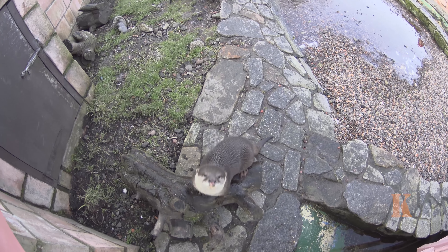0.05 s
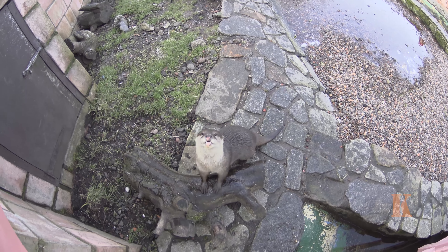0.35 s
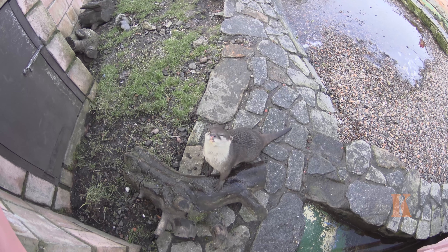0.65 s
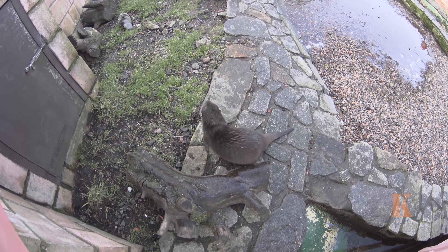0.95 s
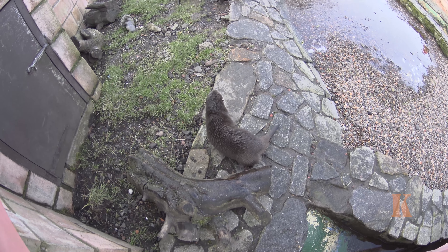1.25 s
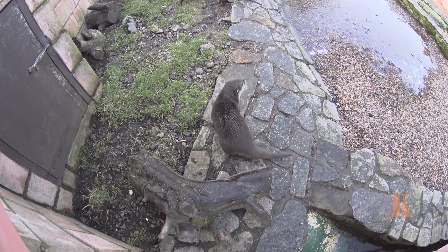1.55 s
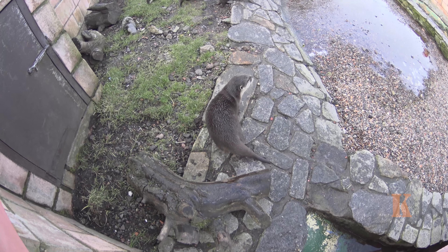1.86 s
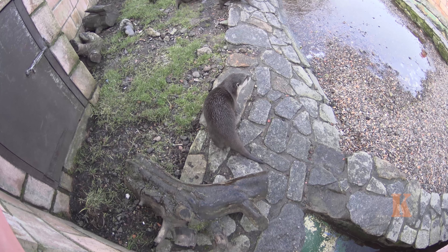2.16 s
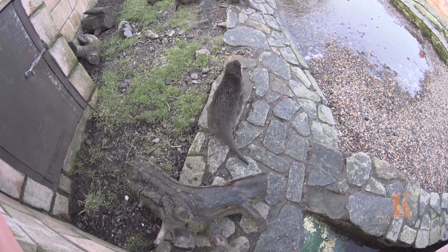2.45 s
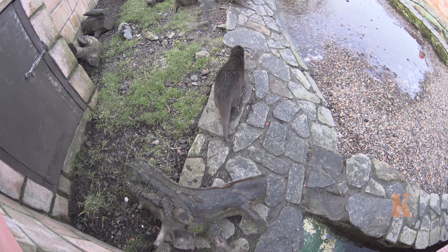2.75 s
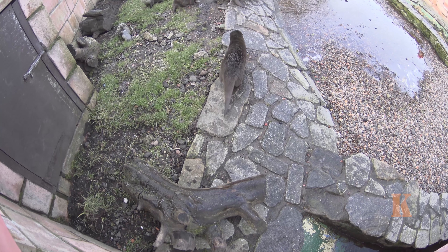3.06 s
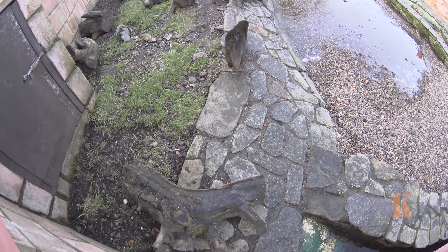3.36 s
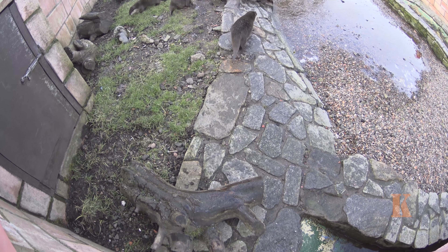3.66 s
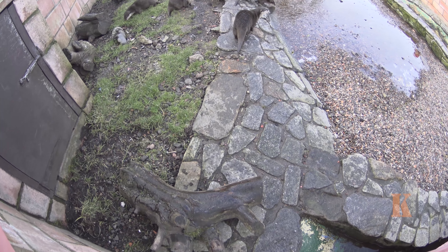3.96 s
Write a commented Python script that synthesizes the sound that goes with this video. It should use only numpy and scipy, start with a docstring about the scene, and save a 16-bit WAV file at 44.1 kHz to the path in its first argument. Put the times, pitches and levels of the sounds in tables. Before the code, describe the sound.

An otter gives high, whistling squeaks that fall in pitch and end hoarse. The loudest comes at 0.3 seconds, just after rubbing and two sharp knocks on the microphone's plastic case. From 1.4 seconds six more follow about every half second, growing fainter and slightly more echoing. Light bumps tap the case from 0.8 seconds. Soft wind, thin hiss, ticking grit and a few faint water gurgles lie underneath.

```python
"""An otter walks off along a stone path in a walled pen, over soft wind and a thin hiss.
First a low call dies away while the camera's plastic case is rubbed and knocked twice, ringing near
1.5 kHz. Grit ticks underfoot, water gurgles, and at 0.3 s comes the otter's first high, falling squeak.
From 0.8 s light bumps shake the case. From 1.4 s six more squeaks follow, with a growing share of echo
from the walls. Near the end the water gurgles again."""
import sys
import numpy as np
from scipy import signal
from scipy.fft import rfft, irfft, next_fast_len
from scipy.io import wavfile
from scipy.ndimage import uniform_filter1d, map_coordinates

SR = 44100
rng = np.random.default_rng(int(sys.argv[2]) if len(sys.argv) > 2 else 0)


def put_to_file(sound):
    """Save the sound as 16-bit audio at rate SR, in the file named by the first command-line argument."""
    columns = np.atleast_2d(sound).T  # one column per channel
    safe = np.clip(columns, -1, 1)
    whole_steps = np.round(safe * 32767)
    wavfile.write(sys.argv[1], SR, whole_steps.astype(np.int16))


N = 176400
T = np.arange(N) / SR
TOP_HZ = 15600  # the highest sound the camera keeps

def amp(db):
    """Turn decibels into a number to multiply by."""
    return 10 ** (np.asarray(db) / 20)

def unit(x):
    """Scale a sound to an average strength (rms) of 1."""
    return x / np.sqrt(np.mean(x ** 2) + 1e-20)

def along(points, hz):
    """Read between (f/Hz, value) points, with octaves evenly spaced."""
    f, v = np.transpose(points)
    return np.interp(np.log(hz + 1), np.log(f + 1), v)

def curves(rows):
    """Join timed points with straight lines, one curve for each column after the time."""
    times, *columns = np.transpose(rows)
    return [np.interp(T, times, column) for column in columns]

def wobble(rate):
    """A smooth curve through `rate` random values a second."""
    return map_coordinates(rng.standard_normal(int(N * rate / SR) + 4), [T * rate])

# How alike left and right are (1 = the same): f/Hz, likeness
LIKENESS = [(30,1),(150,0.97),(350,0.68),(700,-0.083),(1300,0.74),(1780,1),(2080,-0.8),(2700,-0.69),(3600,0.56),(13000,0.93)]
def noise(colour):
    """Stereo noise; its colour says how strong the low and high parts are."""
    hz = np.fft.rfftfreq(N, 1 / SR)
    width = np.tan(np.arccos(np.clip(along(LIKENESS, hz), -.95, 1)) / 2)
    spectrum = rfft(rng.standard_normal((2, N))) * amp(along(colour, hz))
    mid, side = irfft(spectrum * [np.ones(len(hz)), width], N)
    return np.array([mid + side, mid - side]) / mid.std()

def bursts(rows, colour, fade_s):
    """A puff of noise for each (t/s, level/dB) row, dying by 60 dB in fade_s."""
    out, source = np.zeros((2, N)), noise(colour)
    t = T[:SR // 8]
    shape = amp(-60 * t / fade_s) * (1 - np.exp(-t / 0.00037))
    for start, db in rows:
        span = slice(round(start * SR), round(start * SR) + len(t))
        out[:, span] += amp(db) * unit(source[:, span] * shape) * np.sqrt(np.mean(shape ** 2))
    return out

# The wind's rise and fall: t/s, level/dB
WIND_LEVEL = [(0,-54),(.28,-67),(.48,-51),(.67,-72),(.8,-54),(1.19,-54.5),(1.28,-61.5),(1.7,-68),(2.2,-61.5),(2.4,-73),(3.1,-67),(3.72,-54.5),(4,-69.5)]
# Its low rumble: f/Hz, level/dB
WIND_TONE = [(20,-14),(40,-9.5),(100,-0.5),(150,-2),(200,5),(300,2),(500,-4.5),(800,-4),(1500,-17),(4000,-73)]
def wind():
    """Soft wind swells and sinks in uneven gusts."""
    db, = curves(WIND_LEVEL)
    return amp(db + 2.6 * wobble(37)) * noise(WIND_TONE)

# Colour of the hiss: f/Hz, level/dB
HISS_TONE = [(30,-12.5),(1000,-9),(1250,-1),(1440,11.5),(1600,-25),(1950,-2.5),(2200,2),(2800,-12.5),(4200,-13),(5500,-5.5),(6600,-8.5),(10000,-16),(12000,-12.5),(14200,-11),(15500,-17)]
def hiss():
    """A thin hiss sways slowly and flickers fast."""
    return amp(-52 + .8 * wobble(8.2) + 3.5 * wobble(150)) * noise(HISS_TONE)

# The case's one narrow ring in the breeze: f/Hz, level/dB
BUZZ_TONE = [(1100,-58),(1440,19),(1800,-54)]
def case_buzz():
    """The breeze sets the case ringing in fits and starts."""
    return amp(-63 + 9 * wobble(34)) * noise(BUZZ_TONE)

# Pitch and fade of the lower call: t/s, f/Hz, level/dB
LOW_CALL = [(0,1146,-42.5),(.035,1067,-50),(.07,1017,-53),(.1,1010,-89.5)]
# Its overtones, the only part heard: multiple of the pitch, level/dB
LOW_CALL_OVERTONES = [(4,-6),(5,-2.5),(6,-9),(7,-6)]
def whine():
    """The thin end of a lower call sinks and dies away."""
    hz, db = curves(LOW_CALL)
    phase = 2 * np.pi * np.cumsum(hz * (1 + 0.0092 * wobble(510))) / SR
    voice = sum(amp(level) * np.sin(round(k) * phase) for k, level in LOW_CALL_OVERTONES)
    return amp(db) * (T < LOW_CALL[-1][0]) * voice

# How hard the case is rubbed: t/s, level/dB
RUB_LEVEL = [(0,-30),(.011,-16),(.027,-26),(.039,-21),(.05,-27.5),(.075,-29),(.088,-35),(.11,-30.5),(.165,-35),(.18,-43),(.62,-49),(.76,-48),(1.15,-48.5),(1.35,-55.5),(1.76,-61.5),(2.2,-46.5),(2.4,-60.5),(2.56,-44.5),(2.68,-61),(3.33,-49),(3.7,-43),(4,-66.5)]
# Colour of rubbed plastic: f/Hz, level/dB
RUB_TONE = [(30,-26.5),(260,-20),(570,-25.5),(800,-13),(950,-23),(1410,-1.5),(1800,-1.5),(2020,-16.5),(2440,-23),(2900,-35.5),(6000,-51.5)]
def rubbing():
    """Rubbing on the case makes a grainy rustle."""
    db, = curves(RUB_LEVEL)
    return amp(db) * unit(noise(RUB_TONE) * amp(2 * wobble(170)))

# Knocks on the case: t/s, level/dB, length/s
HARD_KNOCKS = [(0.1919,-14.5,0.0082),(0.239,-18,0.0084)]
# Colour of a knock: f/Hz, level/dB
KNOCK_TONE = [(200,-18.5),(500,-27),(800,-13.5),(1050,-16),(1400,-3),(1700,4),(2000,-11.5),(2300,-14.5),(2900,-28.5),(3900,-26),(4600,-23),(5400,-43),(15000,-58)]
def knocks():
    """Two hard knocks on the case, each a quick swell of noise."""
    out = np.zeros((2, N))
    for start, db, length in HARD_KNOCKS:
        shape = np.exp(-np.square(2 * (T - start) / length - 1))
        out += amp(db) * unit(noise(KNOCK_TONE) * shape) * np.sqrt(np.mean(shape ** 2))
    return out

# Clear ticks of grit: t/s, level/dB
GRIT_TICKS = [(0.277,-33),(0.6736,-34.5),(1.8157,-30),(2.1227,-31.5),(2.6434,-25),(3.1574,-31),(3.273,-27)]
# Colour of grit on stone: f/Hz, level/dB
GRIT_TONE = [(2000,-10),(4000,-14),(6300,5),(8000,-9),(10000,-13),(13500,2),(15500,-11)]
def grit():
    """Grit shifts underfoot: a few clear ticks among many tiny scuffs."""
    scuffs_per_s, scuff_s = 65, 0.00057
    hits = rng.random(N) < scuffs_per_s / SR
    sizes = amp(-2 * np.minimum(rng.standard_normal(N), 2))
    scuffs = signal.lfilter([1], [1, -np.exp(-1 / (scuff_s * SR))], hits * sizes)  # each hit dies away
    return bursts(GRIT_TICKS, GRIT_TONE, fade_s=0.011) + amp(-59) * unit(scuffs * noise(GRIT_TONE))

# Gurgles and their starting pitch: t/s, f/Hz, level/dB
WATER_GURGLES = [(.305,626,-45.5),(.495,611,-49.5),(.615,640,-49.5),(3.432,682,-41.5),(3.512,614,-44.5),(3.53,880,-49),(3.675,642,-45)]
def water():
    """Water gurgles softly: each gurgle is a narrow band of noise that rises in pitch."""
    length_s, rise, width_hz = 0.0376, 0.663, 380
    out = np.zeros(N)
    churn = unit(wobble(width_hz)) + 1j * unit(wobble(width_hz))  # blurs a tone into noise
    for start, hz, db in WATER_GURGLES:
        on = (T > start) & (T < start + length_s)
        progress = (T[on] - start) / length_s
        phase = 2 * np.pi * np.cumsum(hz * (1 + rise * progress)) / SR
        band = np.real(churn[on] * np.exp(1j * phase))
        out[on] += amp(db) * np.sin(np.pi * progress) * unit(band) / np.sqrt(2)
    return out * amp([[-2], [2]])  # a little to the right

# Pitch and loudness, one list for each squeak: t/s, f/Hz, level/dB
SQUEAK_SHAPES = [
    [(0.328,5700,-34),(0.336,6000,-19.5),(0.342,6920,-27),(0.356,7090,-14.5),(0.37,6515,-12.5),(0.398,6440,-13.5),(0.425,6210,-17.5),(0.438,5750,-13),(0.45,4610,-27.5),(0.457,4560,-16.5),(0.467,4448,-15),(0.473,4200,-50.5),(0.496,2620,-45),(0.503,2430,-65)],
    [(1.396,5700,-47),(1.406,5910,-40.5),(1.426,6920,-35.5),(1.445,6480,-21.5),(1.48,6380,-26),(1.497,5940,-24),(1.523,4570,-27.5),(1.552,4254,-26),(1.563,3480,-56),(1.575,2410,-41)],
    [(1.894,5490,-46),(1.917,6700,-37),(1.932,6810,-35.5),(1.95,6630,-20),(1.97,6400,-29.5),(1.988,5900,-23.5),(2.002,4650,-29.5),(2.016,4420,-20.5),(2.028,4285,-41.5),(2.04,4050,-28.5),(2.05,3150,-50.5),(2.062,2200,-37.5)],
    [(2.306,3740,-41.5),(2.315,5700,-44.5),(2.328,6440,-26),(2.34,6850,-35.5),(2.355,6670,-24.5),(2.368,6120,-28),(2.383,4280,-35),(2.42,3990,-50.5),(2.437,2760,-56),(2.45,2120,-43.5)],
    [(2.7,5400,-53),(2.72,6650,-33),(2.732,6650,-27.5),(2.765,6200,-26.5),(2.79,5450,-23.5),(2.807,5300,-41),(2.824,4560,-19.5),(2.838,4350,-31.5),(2.853,4020,-29.5),(2.868,3210,-63),(2.878,2450,-32.5),(2.892,2020,-69)],
    [(3.33,5530,-50.5),(3.362,7090,-42),(3.384,6280,-26.5),(3.4,6050,-38.5),(3.412,5540,-26),(3.437,5574,-34),(3.45,4560,-34),(3.463,4340,-42.5),(3.48,2360,-56)],
    [(3.78,5360,-55),(3.8,6770,-38),(3.814,7010,-47.5),(3.832,6250,-30),(3.85,5630,-31.5),(3.873,6050,-35),(3.887,5900,-29),(3.9,4610,-35),(3.92,3900,-45),(3.935,2710,-52),(3.952,2090,-42)],
]
# The voice's overtones: multiple of the pitch, level/dB
SQUEAK_OVERTONES = [(2,0.5),(3,-1.5),(4,-23),(5,-27)]
# Added to the overtones, one value for each squeak: level/dB
BRIGHTNESS = [-8,-11,-11.5,-5,-12,-9.5,-11.5]
# Added to each overtone by how high it is: f/Hz, level/dB
OVERTONE_COLOUR = [(6600,6),(7800,0.5),(9000,-10.5),(10000,-5),(11500,6),(13700,-0.5),(14300,4.5),(15000,-23)]
def squeaks():
    """A nearly pure whistle arches, holds, steps down and turns hoarse as it drops away."""
    fade_s, hoarse_below_hz = .003, 3900
    out = np.zeros(N)
    waver = wobble(700)
    flutter = amp(2 * wobble(180) + 1.1 * wobble(900))  # a tremble plus a finer rasp
    hoarse, crackle = wobble(1500), wobble(450)
    for rows, bright_db in zip(SQUEAK_SHAPES, BRIGHTNESS):
        times, *columns = np.transpose(rows)
        on = (T > times[0] - fade_s) & (T < times[-1] + fade_s)
        t = T[on]
        hz, db = [uniform_filter1d(np.interp(t, times, column), size=200) for column in columns]
        broken = np.clip((hoarse_below_hz - hz) / 500, 0, 1)  # 0 = clear, 1 = fully hoarse
        shaky_hz = hz * (1 + 0.0055 * waver[on] + .045 * broken * hoarse[on])
        phase = 2 * np.pi * np.cumsum(shaky_hz) / SR
        voice = np.sin(phase)
        for k, level in SQUEAK_OVERTONES:
            gain = amp(bright_db + level + along(OVERTONE_COLOUR, k * hz))
            voice += gain * (k * hz < TOP_HZ) * np.sin(round(k) * phase)
        crackle_db = 4 * broken * np.minimum(crackle[on], 1)
        fade = np.clip(np.minimum(t - times[0], times[-1] - t) / fade_s / 2 + .5, 0, 1)
        out[on] += np.sqrt(2) * amp(db + crackle_db) * voice * fade
    return out * flutter

def pen_echoes(voice):
    """Stone and walls throw the voice back, more so as the otter walks off."""
    fade_s, far_wall_s, growth_db_per_s = .2, .048, 2.6
    t = T[:SR // 2]
    tail = rng.standard_normal((3, len(t))) * amp(-60 * t / fade_s) * (t > .004)
    tail = np.diff(tail[0] + .5 * tail[1:], prepend=0)  # rough stone scatters high sounds most
    walls = np.zeros(len(t))
    delays_s = .002 + .025 * rng.random(size=8)  # eight early echoes
    np.add.at(walls, (SR * delays_s).astype(int), rng.choice([-1, 1], size=8))
    answer = amp(-18) * tail / np.linalg.norm(tail[0]) + amp(-19) * walls / np.linalg.norm(walls)
    growth = amp(growth_db_per_s * T)
    far_echo = amp(-32) * growth * np.pad(voice, (round(far_wall_s * SR), 0))[:N]
    return far_echo + signal.fftconvolve((voice * growth)[None], answer, axes=1)[:, :N]

# How much louder the nearby voice is on the left than on the right: f/Hz, level/dB
LEFT_LEAD = [(2400,26),(3400,-12),(4600,8),(5800,3),(7000,2.5),(11000,-1),(15000,-1)]
def otter():
    """The calls and their echoes start mostly on the left and drift towards the centre."""
    drift_s = 4
    voice = whine() + squeaks()
    centred = voice + pen_echoes(voice)
    lead_db = along(LEFT_LEAD, np.fft.rfftfreq(N, 1 / SR))
    leftward = irfft(rfft(centred) * amp([lead_db / 2, -lead_db / 2]), N)
    near = np.exp(-np.square(T / drift_s))
    return near * leftward + (1 - near) * centred

# Bumps on the case: t/s, thump level/dB, thud level/dB, ring level/dB
LIGHT_BUMPS = [(0.84,-47,-34,-32.5),(1.173,-45,-47,-37.5),(1.205,-47,-43,-40),(1.478,-48.5,-47,-39.5),(1.736,-67,-50,-39.5),(1.822,-63,-59,-34),(2.008,-71,-37,-37.5),(2.256,-63,-33,-27.5),(2.269,-63,-33.5,-33),(2.695,-58,-34.5,-42),(2.83,-56,-40.5,-23.5),(2.923,-52,-32,-29.5),(3.022,-50,-32.5,-33.5),(3.161,-57,-35,-27.5),(3.372,-53,-30.5,-34.5),(3.665,-57,-50,-31)]
# Colours of the thump, the thud and the ring: f/Hz, level/dB
THUMP_TONE = [(20,-3),(100,16),(600,-70)]
THUD_TONE = [(30,-18),(120,-6),(260,14.5),(480,1),(850,4),(1200,-3),(3000,-43)]
RING_TONE = [(100,-9.5),(500,-11),(800,-15),(1050,-33),(1300,7),(1440,5.5),(1560,-34),(1700,11),(1850,-41),(2020,1.5),(2250,-17.5),(2900,-24),(5000,-20),(15000,-66)]
def bumps():
    """Each light bump on the case gives a deep thump, a dull thud and a short plastic ring."""
    times, thump_db, thud_db, ring_db = np.transpose(LIGHT_BUMPS)
    thump = bursts(zip(times, thump_db), THUMP_TONE, fade_s=0.035)
    thud = bursts(zip(times, thud_db), THUD_TONE, fade_s=0.013)
    ring = bursts(zip(times, ring_db), RING_TONE, fade_s=0.027)
    return thump + thud + ring

def scene():
    """All the sounds added together, left and right."""
    return otter() + rubbing() + knocks() + bumps() + grit() + water() + wind() + hiss() + case_buzz()

def record(dry):
    """The camera keeps nothing above TOP_HZ."""
    size = next_fast_len(N + SR // 4)
    kept = np.fft.rfftfreq(size, 1 / SR) < TOP_HZ
    return irfft(rfft(dry, size) * kept, size)[:, :N]


dry = scene()
out = record(dry)
put_to_file(out)
```